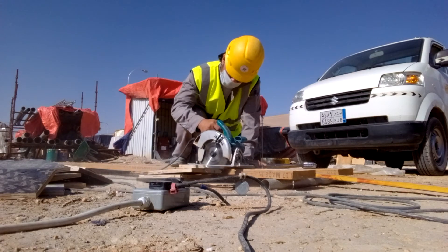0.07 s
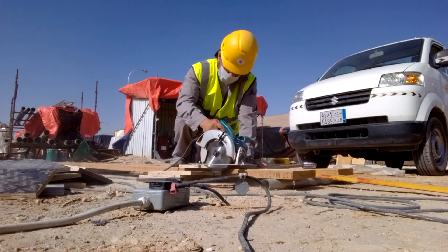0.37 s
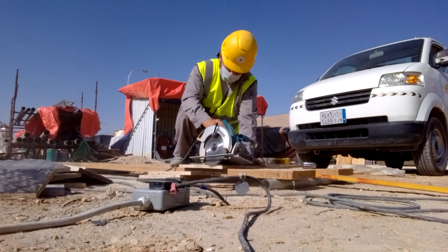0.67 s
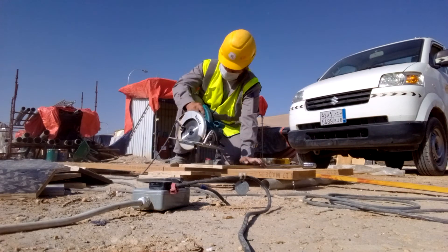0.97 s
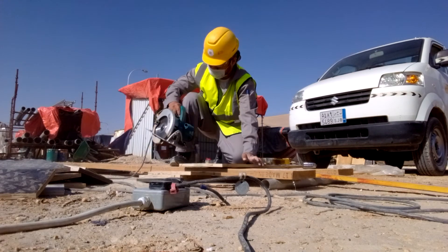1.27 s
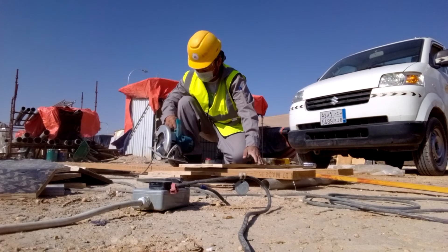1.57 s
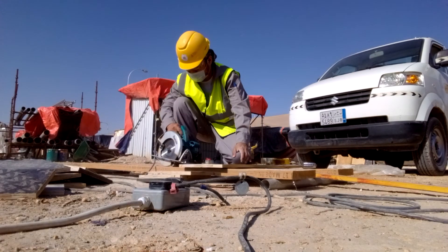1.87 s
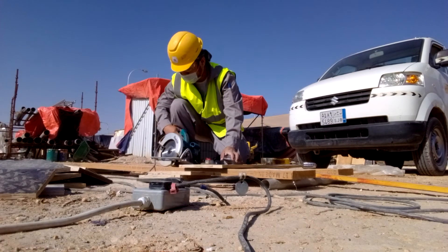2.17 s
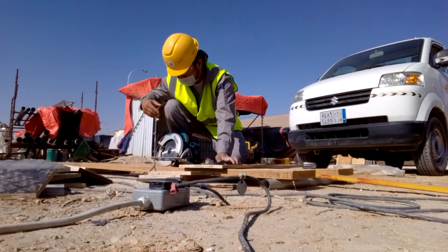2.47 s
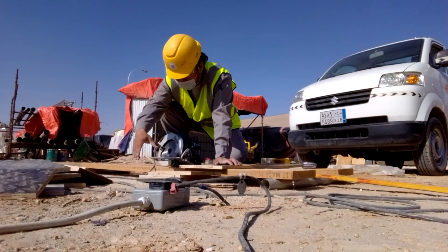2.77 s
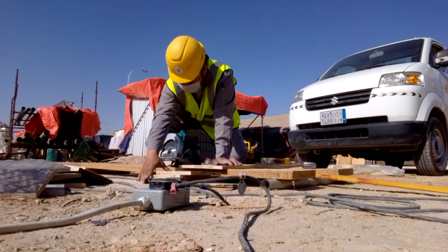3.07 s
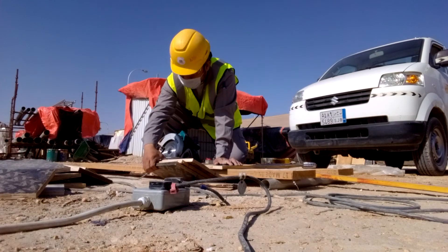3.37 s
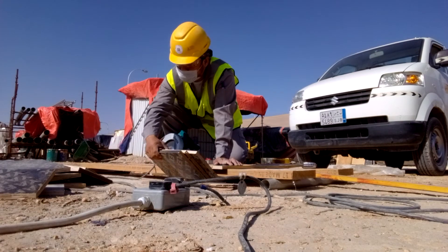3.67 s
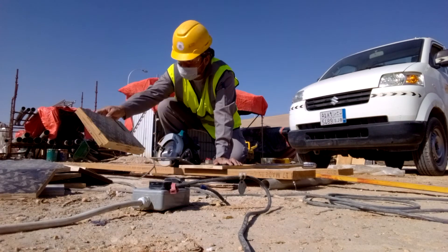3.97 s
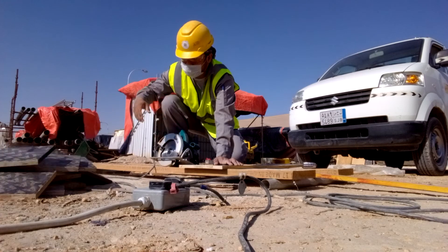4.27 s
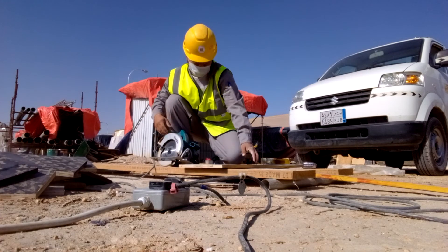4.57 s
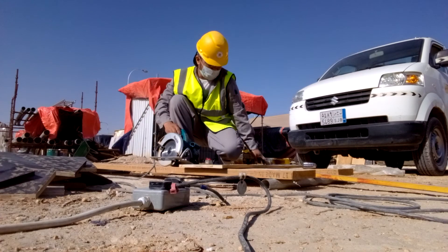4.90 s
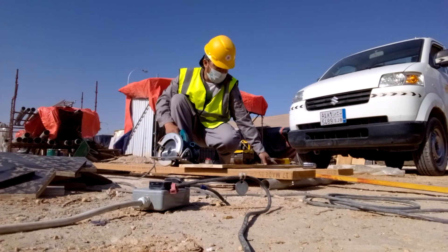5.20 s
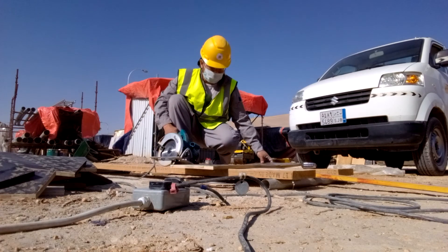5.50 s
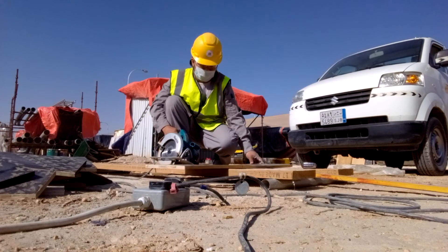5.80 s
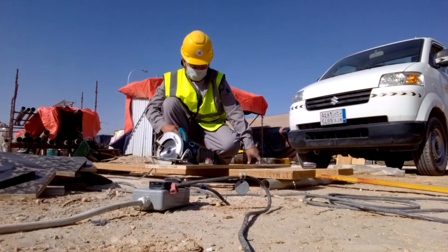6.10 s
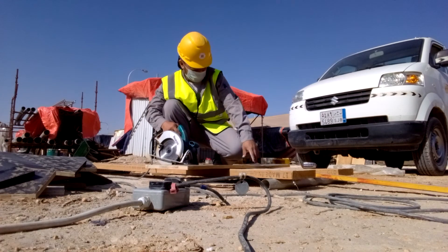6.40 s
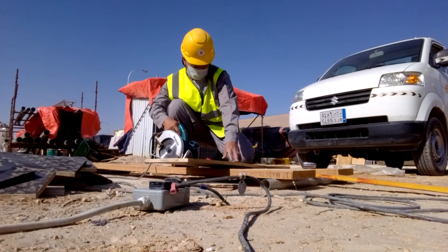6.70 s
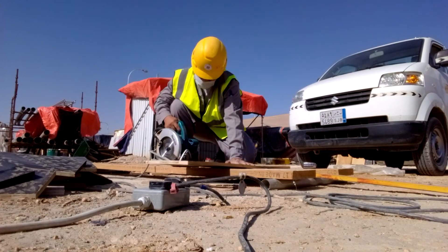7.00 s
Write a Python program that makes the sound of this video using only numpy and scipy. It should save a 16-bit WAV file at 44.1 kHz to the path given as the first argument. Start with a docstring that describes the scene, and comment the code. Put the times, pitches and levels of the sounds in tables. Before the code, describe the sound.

The sound opens outdoors on a nearby circular saw just leaving a cut in wood, its blade rasping and singing with high metallic tones that fade within the first second. At about 0.2 seconds the motor starts to coast, and at 0.8 seconds the blade guard shuts with one sharp clack. A hissing, rattling whir follows, its whining tones gliding steadily downward. Soft wooden knocks come near 0.9 and 1.9 seconds. A wavering metallic ring pulses through the whir, strongest between 3.5 and 4 seconds. At 4.2 seconds an offcut hits a pile of boards with a loud, quick clatter, the loudest event, settling by 4.6 seconds. The whir grows lower and weaker and dies just before 7 seconds, with faint knocks and scrapes of wood. A distant engine hums low throughout, with light wind puffing on the microphone around 2.7 and 3.4 seconds.

```python
"""Outdoors, over a far engine and light wind, a circular saw leaves its cut, the kerf rubbing the blade's
modes into song. At 0.2 s the motor begins to coast; at 0.8 s the guard snaps shut. As friction slows
the shaft, gear and commutator tones glide down through housing resonances and a wavering metallic ring.
At 4.2 s an offcut clatters onto a pile of boards, a limiter ducking under the loudest knocks.
The whir of fan, gears and brushes dies away as the motor runs down, just before 7 s."""
import sys
import numpy as np
from scipy import signal
from scipy.fft import rfft, irfft, next_fast_len
from scipy.io import wavfile
from scipy.ndimage import uniform_filter1d, minimum_filter1d, map_coordinates

SR = 44100
rng = np.random.default_rng(int(sys.argv[2]) if len(sys.argv) > 2 else 0)


def store_pcm(level_fs):
    """Save levels as 16-bit WAV."""
    pcm = np.round(np.clip(level_fs, -1, 1) * 32767).astype(np.int16)
    wavfile.write(sys.argv[1], SR, np.atleast_2d(pcm).T)


N = 310905
TIME = np.arange(N) / SR

FULL_HZ = 325  # armature turns per second under power
PINION_TEETH, COMMUTATOR_BARS, GEAR_RATIO = 11, 32, 3.9
# speed law of the shaft tones: (full-speed level [dB], loss per halving [dB], stall speed [Hz])
SHAFT_LAW = (-39.5, 5.8, 31)
# the whir as the saw is lifted, set down and screened by the offcut: (time [s], level [dB])
WHIR_SWELL = [(0, -0.5), (.85, 5), (1.5, -0.5), (2.05, 0.5), (2.85, 0), (3.55, -3.5), (4.3, 2.5), (4.9, 0),
              (5.45, 3), (5.75, 2.5), (6.5, 2)]


def amp(db):
    """Amplitude ratio of a level in decibels."""
    return 10 ** (np.asarray(db) / 20)


def unit(x):
    """Normalisation to rms 1."""
    return x / np.sqrt(np.mean(x ** 2) + 1e-20)


def along(points, hz):
    """Interpolation of (frequency [Hz], value) points on a logarithmic axis."""
    freqs, values = np.transpose(points)
    return np.interp(np.log(hz + 1), np.log(freqs + 1), values)


def envelope(points):
    """Linear interpolation of (time [s], level [dB]) points at every sample."""
    return np.interp(TIME, *np.transpose(points))


def hump(peak_s, width_s):
    """A Gaussian pulse of height 1."""
    return np.exp(-((TIME - peak_s) / width_s) ** 2)


def wobble(rate):
    """Random modulation: a spline through rate Gaussian knots a second."""
    knots = rng.standard_normal(int(N * rate / SR) + 4)
    coarse = np.arange(0, N + 64, 64)
    return np.interp(np.arange(N), coarse, map_coordinates(knots, [coarse * rate / SR]))


def filtered(x, response):
    """Linear filtering: the spectrum is multiplied by a frequency response."""
    size = next_fast_len(N + SR // 2)
    return irfft(rfft(x, size) * response(np.fft.rfftfreq(size, 1 / SR)), size)[..., :N]


def resonances(modes, hz):
    """Superposed second-order resonators: (frequency [Hz], bandwidth [Hz], gain [dB])."""
    return sum(amp(db) * 1j * hz * width / (centre ** 2 - hz ** 2 + 1j * hz * width)
               for centre, width, db in modes)


def free_decay(modes, t):
    """Free vibration as damped sinusoids: (frequency [Hz], level [dB], T60 [s])."""
    return sum(amp(db - 60 * t / t60) * np.sin(2 * np.pi * hz * t) for hz, db, t60 in modes)


def stereo_noise(response):
    """Partially coherent noise of rms 1, less alike between the ears in the treble."""
    # (frequency [Hz], left-right correlation)
    coherence = [(60, 0.81), (300, 0.8), (700, 0.93), (1400, 0.91), (3000, 0.5), (7000, 0.34),
                 (15000, 0.12)]

    def mid_and_side(hz):
        turn = np.arccos(along(coherence, hz)) / 2
        return response(hz) * np.array([np.cos(turn), np.sin(turn)])
    mid, side = filtered(rng.standard_normal((2, N)), mid_and_side)
    return unit(np.array([mid + side, mid - side]))


def coloured(spectrum):
    """Spectral shaping of stereo noise by (frequency [Hz], relative density [dB]) points."""
    return stereo_noise(lambda hz: amp(along(spectrum, hz)))


def wind(breeze_db=-61.5):
    """Turbulent pressure at the microphone: a low rumble with two puffs."""
    # puffs: (peak time [s], half width [s], level [dB])
    gusts = [(2.7, 0.043, -40), (3.38, 0.16, -47)]
    strength = amp(breeze_db) + sum(amp(db) * hump(s, width) for s, width, db in gusts)
    return strength * coloured([(15, -22), (35, -6), (60, -2), (110, -26), (400, -42.5), (2000, -100)])


def background(engine_hz=89.8):
    """Tones over a noise floor: two harmonics of a far engine, its rumble, open air and wind."""
    # engine rumble: (frequency [Hz], relative density [dB])
    rumble = [(15, -57), (25, -27.5), (38, -28), (68, 1.5), (92, 2.5), (146, -1), (249, -2), (340, -18),
              (400, -16), (520, -43.5), (880, -120)]
    # outdoor ambience: (frequency [Hz], relative density [dB])
    open_air = [(100, -0.5), (330, -1.5), (430, -5.5), (550, 0), (900, -9), (2000, -12.5), (3500, -18),
                (6500, -17.5), (9000, -29), (15000, -39.5)]
    phase = 2 * np.pi * engine_hz * TIME + .5 * wobble(7.6)
    engine = amp(-45.5 + 1.53 * wobble(4.8)) * np.sin(phase)
    engine += amp(-57 + 3.8 * wobble(8.2)) * np.sin(2 * phase)
    return engine + wind() + amp(-48.5) * coloured(rumble) + amp(-54.5) * coloured(open_air)


def yard_echo(x, t60=.17, cutoff_hz=4500):
    """Diffuse reflection: ground, van and timber scatter a short, dull tail to each ear."""
    t = np.arange(SR // 3) / SR
    tail = rng.standard_normal((2, len(t))) * amp(-60 * t / t60) * (t > .004)
    tail = signal.lfilter(*signal.butter(2, cutoff_hz, fs=SR), tail)
    return signal.fftconvolve(x[None], tail / np.linalg.norm(tail[0]), axes=1)[:, :N]


def wood_slides(relative_width=0.27):
    """Stick-slip friction: rough grain catches and lets go, exciting one broad resonance of a board."""
    # saw shoe and boards sliding: (time [s], duration [s], level [dB], resonance [Hz])
    slides = [(0.079, 0.63, -37.5, 577), (0.719, 0.13, -34, 510), (0.899, 0.066, -34.5, 493),
              (0.982, 0.42, -50.5, 513), (1.202, 0.051, -43, 270), (6.551, 0.37, -52.5, 304),
              (4.158, 0.099, -11.5, 820), (4.199, 0.15, -35.5, 252), (4.234, 0.12, -27.5, 504),
              (4.335, 0.063, -31, 890), (4.42, 0.063, -36.5, 900), (6.618, 0.059, -51.5, 700),
              (6.74, 0.059, -47, 480), (6.976, 0.07, -53.5, 524)]
    out = np.zeros(N + SR)
    for s, length, db, hz in slides:
        count = int(length * SR)
        slips = rng.standard_normal(count) * (rng.random(count) < .02)
        force = signal.lfilter(*signal.butter(2, 2 * hz, fs=SR), slips)
        rub = signal.lfilter(*signal.iirpeak(hz, 1 / relative_width, fs=SR), force)
        out[round(s * SR):][:count] += amp(db) * unit(rub) * np.sqrt(np.hanning(count))
    return out[:N]


def with_rebounds(knocks, count=3, gap_s=.011, loss_db=11.5, dulling=0.73):
    """Inelastic impact: each knock is followed by uneven rebounds, each softer and duller."""
    gaps = gap_s * rng.uniform(.5, 1.5, (len(knocks), count))
    return [(s + gap[:k].sum(), db - loss_db * k, hz * dulling ** k)
            for (s, db, hz), gap in zip(knocks, gaps) for k in range(count + 1)]


def board_knocks(drum_hz=700, give_s=0.0013, crack_t60=0.0064, clatter_t60=.055):
    """Impact excitation: each contact rings the wood's modes anew; soft landings drum the pile."""
    # contacts: (time [s], level [dB], brightness [Hz])
    knocks = [(0.925, -27, 650), (1.893, -27, 1000), (4.156, 3.5, 1190), (4.162, 0, 1290),
              (4.171, 3.5, 3820), (4.181, -5, 3800), (4.191, -2, 3000), (4.208, 4.5, 5900),
              (4.249, -17.5, 600), (4.2618, -4.5, 1700), (4.296, -20, 1400), (4.312, -23, 600),
              (4.342, -18.5, 1700), (4.381, -24, 1800), (4.405, -13.5, 430), (4.438, -13.5, 1010),
              (4.585, -37, 800), (6.737, -32, 700), (6.928, -42.5, 1700), (7.037, -45, 2520)]
    # modes of the boards: (frequency [Hz], level [dB], T60 [s])
    board_modes = [(189, -17, 0.1), (252, -15, 0.11), (350, -9, 0.07), (422, -2, 0.075), (522, 0, 0.1),
                   (611, -4, 0.07), (759, 6, 0.065), (888, 4, 0.045), (1020, -2, 0.06), (1095, 1.5, 0.055),
                   (1280, 1.5, 0.06), (1590, 4, 0.023), (1820, -2, 0.04), (2560, -2, 0.035),
                   (2860, -3, 0.03), (3650, -7, 0.04), (4500, -9, 0.03), (5370, -10, .03)]
    # modes of the hollow pile: (frequency [Hz], level [dB], T60 [s])
    pile_modes = [(538, -2, 0.08), (450, -9, 0.03)]
    out, t = np.zeros(N + SR), np.arange(SR // 3) / SR
    drum = free_decay(pile_modes, t) * (1 - np.exp(-t / give_s))
    for s, db, bright_hz in knocks:
        softness = 1 / (1 + (bright_hz / drum_hz) ** 4)
        out[round(s * SR):][:len(t)] += amp(db + 5) * softness * drum
    for s, db, bright_hz in with_rebounds(knocks):
        ring = np.zeros(len(t))
        for hz, level, t60 in board_modes:
            strength = rng.choice([-1, 1]) * amp(level + rng.normal(0, 3.6) - 60 * t / t60)
            ring += strength * np.sin(2 * np.pi * hz * rng.normal(1, 0.022) * t)
        grit_decay = amp(-10 - 60 * t / crack_t60) + amp(-18 - 60 * t / clatter_t60)
        strike = amp(-13) * ring + 2 * grit_decay * rng.standard_normal(len(t))
        strike = signal.lfilter(*signal.butter(2, bright_hz, fs=SR), strike)
        thinning = signal.butter(1, 0.038 * bright_hz, "high", fs=SR)  # a hard edge sounds thin
        out[round(s * SR):][:len(t)] += amp(db) * signal.lfilter(*thinning, strike)
    # narrow, soft boards radiate little bass and little top
    return signal.lfilter(*signal.butter(2, [240, 9000], "band", fs=SR), out[:N])


def shaft_speed(release_s=.21, drag_s=6.889, friction_hz=200.9):
    """Viscous drag and dry friction, equal at friction_hz, brake the armature to one turn a second."""
    coasting = np.maximum(TIME - release_s, 0)
    return np.maximum((FULL_HZ + friction_hz) * np.exp(-coasting / drag_s) - friction_hz, 1)


def by_speed(speed, law):
    """A power law of speed, in dB, falling steeply below the stall speed."""
    db, halving_db, stall_hz = law
    return db + halving_db * np.log2(speed / FULL_HZ) - 10 * np.log10(1 + (stall_hz / speed) ** 4)


def slack(speed):
    """Backlash: 0 under power, 1 once the gears run loose at half speed."""
    return np.clip(2 * (1 - speed / FULL_HZ), 0, 1)


def fan_air(speed, gain_db):
    """Turbulent flow: the fan's broadband noise weakens as it slows."""
    # (full-speed level [dB], loss per halving [dB], stall speed [Hz])
    law = (-37, 7.84, 3)
    # rushing air: (frequency [Hz], relative density [dB])
    spectrum = [(100, -16.5), (250, -13), (480, 3.5), (650, -1.5), (880, 3), (1150, -6), (2000, -5),
                (5000, -60)]
    return amp(by_speed(speed, law) + gain_db + 0.42 * wobble(14)) * coloured(spectrum)


def gear_rattle(speed, gain_db, slow_hz=95):
    """Impact noise: slow teeth meet softly, so the rattle darkens as it fades."""
    # (full-speed level [dB], loss per halving [dB], stall speed [Hz])
    law = (-32.5, 4.76, 8.4)
    # fast gears: (frequency [Hz], relative density [dB])
    fast_spectrum = [(500, -19), (1000, -10.5), (1500, 2), (1800, 1), (2120, 5.5), (2380, -1), (2600, 3.5),
                     (3100, -1), (3480, -3), (3750, -3.5), (5000, -11), (9000, -30.5)]
    # slow gears: (frequency [Hz], relative density [dB])
    slow_spectrum = [(500, -24.5), (850, -18), (980, 4), (1120, -6.5), (1400, -0.5), (1600, 3), (1850, -4),
                     (2150, -3.5), (2700, -10.5), (3400, -10.5), (3800, -17), (5000, -17), (9000, -35)]
    slow = 1 / (1 + (speed / slow_hz) ** 4)
    gears = np.sqrt(1 - slow) * coloured(fast_spectrum) + np.sqrt(slow) * coloured(slow_spectrum)
    return amp(by_speed(speed, law) + gain_db + 0.86 * wobble(24.83)) * gears


def brush_hiss(speed, gain_db, throb):
    """Sliding friction: the brushes hiss, and a narrow whistle stands out as the motor slows."""
    # (full-speed level [dB], loss per halving [dB], stall speed [Hz])
    law = (-29.5, 7.15, 30.4)
    # brush noise: (frequency [Hz], relative density [dB])
    spectrum = [(2000, -36), (3800, -13), (5200, -2), (6300, 0), (7200, 1.5), (7800, -6), (8600, -15),
                (10000, -22), (12000, -33.5), (14000, -24.5), (15300, -19)]
    # whistle: (frequency [Hz], bandwidth [Hz], gain [dB])
    whistle_mode = [(6742, 67, 0)]
    level_db = by_speed(speed, law) + gain_db
    hiss = amp(level_db - 1.5 + 1.18 * wobble(16)) * coloured(spectrum) * throb
    whistle_db = level_db - 10 + 7 * slack(speed) + 0.87 * wobble(12)
    whistle = stereo_noise(lambda hz: resonances(whistle_mode, hz) * amp(along(spectrum, hz)))
    return hiss + amp(whistle_db) * whistle


def whir(speed, angle):
    """Incoherent sources add: fan, gears and brushes, swelling and sinking as the saw is moved."""
    # teeth leaving the wood: (extra rattle [dB], its fade [s], extra hiss [dB], its fade [s])
    cut_end = (8.4, 0.12, 14, 0.11)
    # vents turned to the microphone: (peak time [s], half width [s], extra hiss [dB])
    vents = (1.29, 0.4, 3.4)
    rattle_db, cut_s, hiss_db, hiss_s = cut_end
    vents_s, vents_width_s, vents_db = vents
    swell_db, cutting = envelope(WHIR_SWELL), hump(0, cut_s)
    throb = 1 + 0.1 * np.cos(angle)  # the contacts press harder once a turn
    air = fan_air(speed, 0.72 * swell_db - 5 * cutting)  # the kerf muffles the air
    rattle = gear_rattle(speed, swell_db + rattle_db * cutting) * throb
    brush_db = 0.89 * swell_db + hiss_db * hump(0, hiss_s) + vents_db * hump(vents_s, vents_width_s)
    return air + rattle + brush_hiss(speed, brush_db, throb)


def ring_response(hz):
    """Resonance near 1.25 kHz: squared resonators give a narrow band with steep skirts."""
    # modes of the metallic ring: (frequency [Hz], bandwidth [Hz], gain [dB])
    ring_modes = [(1248, 44, 21), (1295, 45, 9)]
    return sum(amp(db) * resonances([(centre, width, 0)], hz) ** 2 for centre, width, db in ring_modes)


def metallic_ring(angle, evenness=.6):
    """Narrow-band resonance: a wavering ring near 1.25 kHz, probably the blade, pulsing as it turns."""
    # the ring comes and goes: (time [s], level [dB])
    ring_levels = [(.2, -48), (.8, -42), (1.4, -52), (2.1, -44), (2.46, -35), (2.62, -45), (2.82, -35),
                   (3.05, -48), (3.3, -34), (3.4, -37), (3.55, -24.5), (3.62, -32), (3.79, -23),
                   (3.87, -39), (4.01, -26.5), (4.07, -37), (4.12, -30), (4.24, -44), (4.36, -35),
                   (4.54, -46), (4.72, -33), (4.84, -48), (4.95, -34), (5.02, -39), (5.13, -30),
                   (5.27, -47), (5.42, -37), (5.55, -47), (5.65, -32), (6.02, -49), (6.1, -44), (6.5, -57),
                   (6.7, -70)]
    note = signal.hilbert(stereo_noise(ring_response), next_fast_len(N))[:, :N]
    steady = unit(note.real / np.abs(note).mean(0) ** evenness)  # partly flattens the envelope
    pulse = 1 + .22 * np.cos(angle / GEAR_RATIO)
    return amp(envelope(ring_levels) - 1.5 + 1.8 * wobble(40)) * steady * pulse


def guard_snap(contact_s=0.0024):
    """Impulse response: the spring swings the guard against its stop in one heavily damped clack."""
    # (time [s], level [dB])
    impact = (.8392, 4.6)
    # guard on its stop: (frequency [Hz], level [dB], T60 [s])
    stop_modes = [(1585, 13, 0.012), (1510, -7, 0.0069)]
    s, db = impact
    t = np.maximum(TIME - s, 0)
    clack = free_decay(stop_modes, t) * (1 - np.exp(-t / contact_s))
    return amp(db) * signal.lfilter(*signal.butter(2, 1000, "high", fs=SR), clack)


def armature_hum(angle):
    """Rotational harmonics: two low hums swell briefly as the motor begins to coast, then fade."""
    # (shaft order, peak time [s], half width [s], level [dB])
    hums = [(1, .21, .16, -37), (2, .37, .15, -39)]
    return np.sqrt(2) * sum(
        amp(db + 1.6 * wobble(20)) * hump(s, width) * np.sin(order * angle + 0.23 * wobble(30))
        for order, s, width, db in hums)


def motor_whine(speed, angle):
    """Passing frequency: pinion teeth and commutator bars each sound at their count times the speed."""
    # gear-mesh tone, swelling through the housing's resonances: (time [s], level [dB])
    mesh_levels = [(.42, -51), (.66, -45), (.8, -35), (.92, -45), (1.12, -33), (1.38, -45), (1.6, -39),
                   (1.87, -56), (2.05, -33), (2.26, -46), (2.4, -43), (2.55, -48), (2.72, -38), (2.96, -53),
                   (3.2, -34.5), (3.42, -44), (3.62, -36), (3.72, -24), (3.8, -20), (3.86, -38),
                   (4.08, -51), (4.62, -53), (5.05, -55), (5.2, -62), (5.4, -48), (5.6, -64)]
    # commutator tone, surfacing briefly: (time [s], level [dB])
    bar_levels = [(1.1, -62), (1.62, -46), (1.76, -52), (2.0, -42), (2.3, -45), (2.42, -52), (2.56, -44),
                  (2.85, -62), (3.08, -49), (3.22, -58), (3.35, -47), (3.56, -64), (3.84, -52), (4.0, -44),
                  (4.1, -55), (4.46, -48), (4.8, -55), (5.05, -52), (5.7, -60)]
    stall_hz = SHAFT_LAW[2]
    running = 1 / (1 + (stall_hz / speed) ** 4)
    return np.sqrt(2) * running * sum(
        amp(envelope(levels) + wobble(24.9)) * np.sin(order * angle + 0.43 * wobble(45))
        for order, levels in [(PINION_TEETH, mesh_levels), (COMMUTATOR_BARS, bar_levels)])


def shaft_tones(speed, angle, first_upper_order=3):
    """Source and filter: each shaft order flares as it crosses a housing mode or the metallic ring."""
    # fractional orders are bearings and the blade shaft: (shaft order, level [dB])
    orders = [(2.0, -12), (3.6, -15), (9.5, -14.8), (10.0, -3), (10.55, -10.1), (12.0, -4.5), (13.0, -8.5),
              (14.0, -13), (15.0, -9), (16.0, -10), (17.0, -7.5), (18.0, -10.1), (19.0, -9.5), (20.0, -8.5),
              (21.0, -4.5), (22.0, -3), (23.0, -8), (24.0, -5.5), (27.0, -10), (28.0, -11), (29.0, -9),
              (30.0, -11), (33.0, -5), (34.0, -9.0), (36.0, -7.5)]
    # housing resonances: (frequency [Hz], bandwidth [Hz], gain [dB])
    housing_modes = [(531, 49, -3), (644, 45, -3), (801, 160, -2), (1540, 90, 8), (1830, 110, 4),
                     (2130, 130, 5.5), (2600, 140, 2.5), (2860, 170, -3.5), (3246, 130, -5),
                     (4200, 300, -7), (4770, 300, -7), (5750, 700, -2), (6700, 300, 7)]
    gear_play = 0.036 * wobble(30)
    upper_db = -7 * (1 - slack(speed))  # upper orders come up as the gears run loose
    tones = np.zeros(N)
    for order, db in orders:
        level_db = db + (order >= first_upper_order) * upper_db + 3 * wobble(13)
        phase = order * angle + min(order, PINION_TEETH) * gear_play + 0.46 * wobble(45)
        tones += amp(level_db) * np.sin(phase + rng.uniform(0, 2 * np.pi))

    def radiation(hz):
        return (resonances(housing_modes, hz) + amp(-5) * ring_response(hz)) / (1 + (hz / 8000) ** 8)
    return filtered(np.sqrt(2) * tones * amp(by_speed(speed, SHAFT_LAW)), radiation)


def blade_envelopes(free_fade_db_per_s=9):
    """Build-up and damping: each family of blade modes grows in a rub, drops and rings on faintly."""
    # the kerf rubs the blade: (time [s], duration [s], level [dB], family [rounded to an index])
    rubs = [(0, 0.049, -8.5, 2), (.01, 0.19, -18.5, 0), (.01, 0.12, -14, 4), (0.063, 0.084, -27.5, 1.5),
            (0.074, 0.43, -25, 1), (0.074, 0.51, -22.5, 3), (0.297, 0.17, -27, 3), (0.367, 0.083, -40, 0),
            (0.727, 0.11, -24.5, 3)]
    # families 0-4 (low, middle, squeal, main ring, top): (attack [s], fade [dB/s], free ring [dB])
    families = [(0.019, 65, -18), (0.01, 45, -16), (0.0014, 1000, -40), (0.017, 80, -32),
                (0.022, 131.5, -35)]
    strengths = np.zeros((len(families), N))
    for s, length, db, family in rubs:
        attack_s, fade_db_per_s, free_db = families[round(family)]
        rise = 1 - np.exp(-np.maximum(TIME - s, 0) / attack_s)
        after = np.maximum(TIME - s - length, 0)
        ring_db = np.maximum(-fade_db_per_s * after, free_db - free_fade_db_per_s * after)
        strengths[round(family)] += rise * amp(db + ring_db)
    return strengths


def kerf_rasp(angle, strengths):
    """Friction noise: fibres scrape the teeth in bands near the blade's modes, pulsing as it turns."""
    # (frequency [Hz], bandwidth [Hz], level [dB], family [rounded to an index])
    bands = [(1227, 240, -21, 2.5), (1710, 440, -16, 1.5), (2840, 1300, -5, 1), (3480, 260, -14.5, 3.5),
             (6070, 690, -13, 4)]
    rasp = np.zeros(N)
    for centre, width, db, family in bands:
        band = filtered(rng.standard_normal(N), lambda hz: resonances([(centre, width, 0)], hz) ** 2)
        rasp += amp(db) * strengths[round(family)] * unit(band)
    return rasp * (1 + 0.61 * np.cos(angle / GEAR_RATIO))


def blade_song(speed, strengths, stiffening=0.0405):
    """Centrifugal stiffening: the rubbed disc sings in modes that sag in pitch as the spin slackens."""
    # (frequency at full speed [Hz], level [dB], family [rounded to an index])
    disc_modes = [(1737, -5.5, 0), (1785, -11.5, 0), (1972, -15.5, 0), (2065, -16.5, 0.5), (2417, -16, 0),
                  (3850, -15.5, 0), (5176, -14.5, 4), (5510, -16, 4), (5973, -11, 4), (2535, -16.5, 1),
                  (2598, -5.5, 1), (2685, -5.5, 1), (2977, -5, 3), (3455, -18, 3), (3516, -3.5, 2),
                  (3670, -21, 2.5), (1245, -18, 1)]
    warped_time = np.cumsum(1 + stiffening * (speed / FULL_HZ - 1)) / SR
    song = np.zeros(N)
    for hz, db, family in disc_modes:
        strength = strengths[round(family)] * amp(db + 2 * wobble(44.8))
        song += strength * np.sin(2 * np.pi * hz * warped_time + 0.57 * wobble(39.43))
    return np.sqrt(2) * song


def scene():
    """Superposition of the saw, the boards, their reflections and the outdoor background."""
    speed, strengths = shaft_speed(), blade_envelopes()
    angle = 2 * np.pi * np.cumsum(speed) / SR
    motor = motor_whine(speed, angle) + armature_hum(angle) + shaft_tones(speed, angle)
    saw = motor + blade_song(speed, strengths) + kerf_rasp(angle, strengths)
    wood = board_knocks() + wood_slides()
    snap = guard_snap()
    echo = yard_echo(amp(-16) * saw + amp(-12) * wood + amp(-24) * snap)
    return saw + wood + snap + echo + whir(speed, angle) + metallic_ring(angle) + background()


def limiter(x, ceiling=0.65, ahead_s=0.013, release_s=0.047):
    """Look-ahead limiting: the gain dips just before a peak and creeps back after it."""
    excess = np.maximum(np.abs(x).max(0) / ceiling, 1)
    ahead = int(ahead_s * SR)
    dip = 1 - minimum_filter1d(1 / excess, 2 * ahead)
    pole = np.exp(-1 / (release_s * SR))
    dip = np.maximum(dip, signal.lfilter([1 - pole], [1, -pole], dip) * 1.45)
    return x * (1 - uniform_filter1d(np.clip(dip, 0, .9), ahead // 4 + 1))


def record(dry, lag_s=4.5e-5, top_hz=15650):
    """Level and time differences between two microphone ports, then a limiter and a band limit."""
    # (frequency [Hz], left minus right level [dB])
    port_balance = [(60, -1.5), (200, 0.5), (700, 0.5), (1290, 1), (2380, 5), (4400, -2), (6800, -13.5),
                    (9000, 0.5), (12000, -1), (15000, -7.5)]

    def ports(hz):
        balance_db = along(port_balance, hz)
        gains = amp(np.outer([.5, -.5], balance_db))
        delays = np.exp(np.outer([-1j, 1j], np.pi * hz * lag_s))
        return gains * delays / np.sqrt(np.cosh(balance_db * np.log(10) / 20))  # constant total power
    return filtered(limiter(filtered(dry, ports)), lambda hz: hz < top_hz)


dry = scene()
out = record(dry)
store_pcm(out)
```